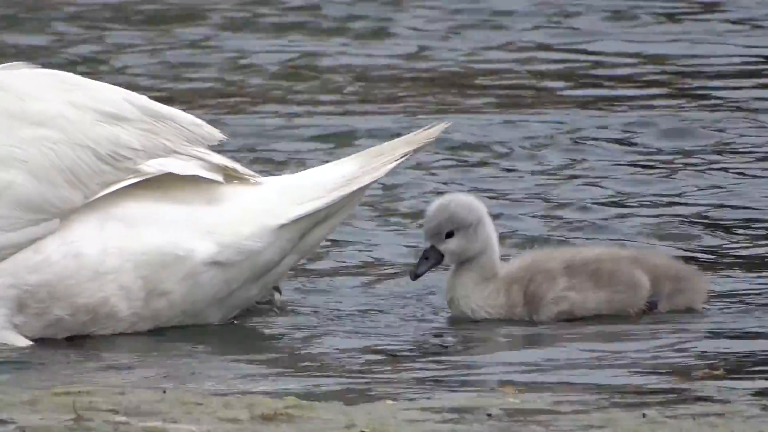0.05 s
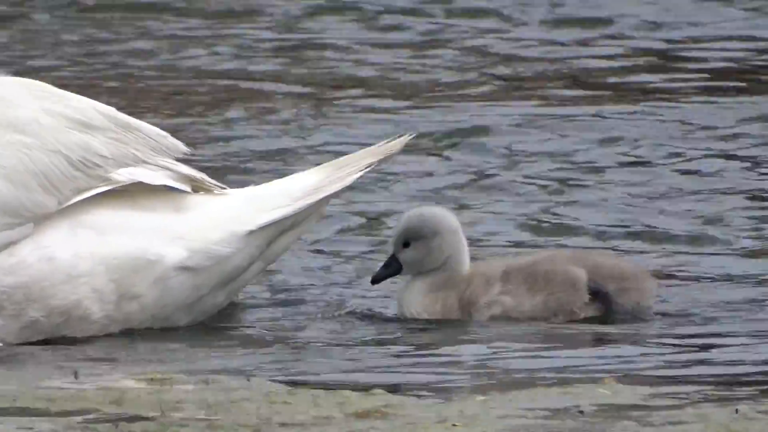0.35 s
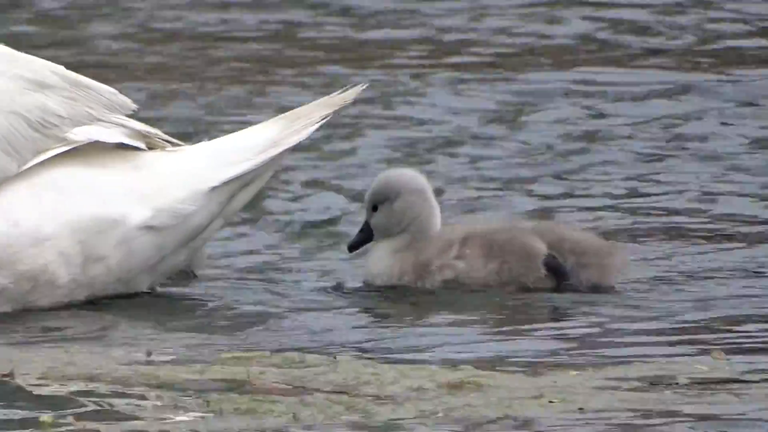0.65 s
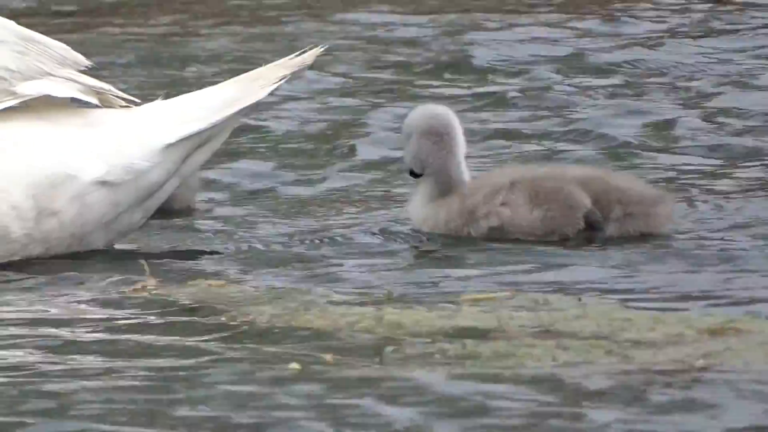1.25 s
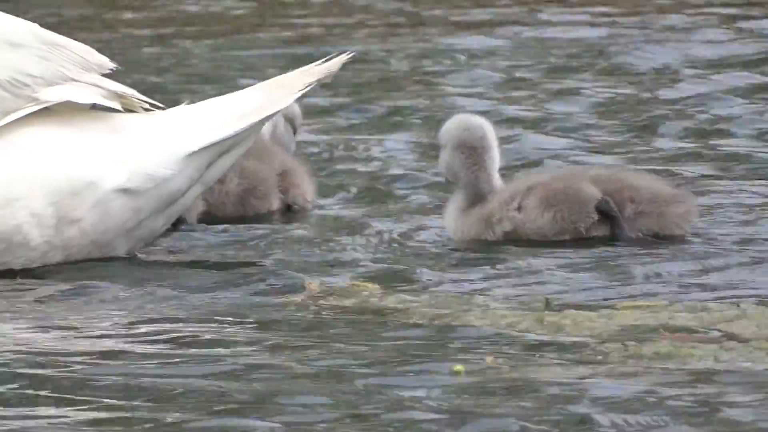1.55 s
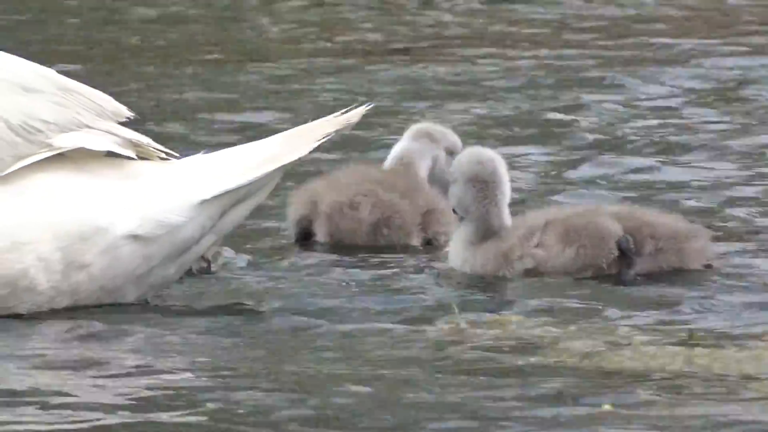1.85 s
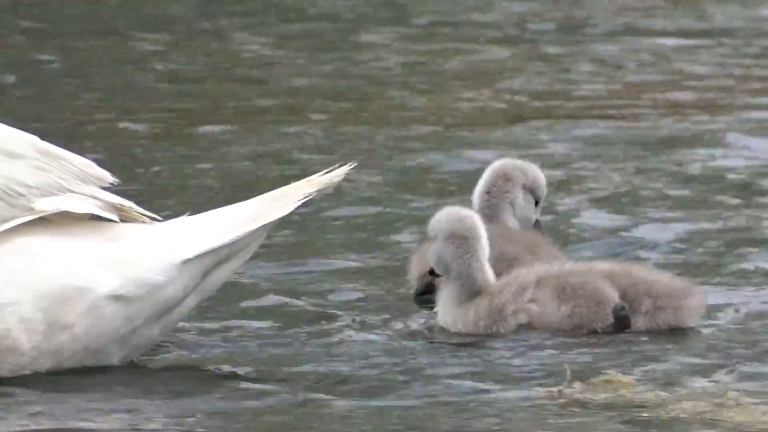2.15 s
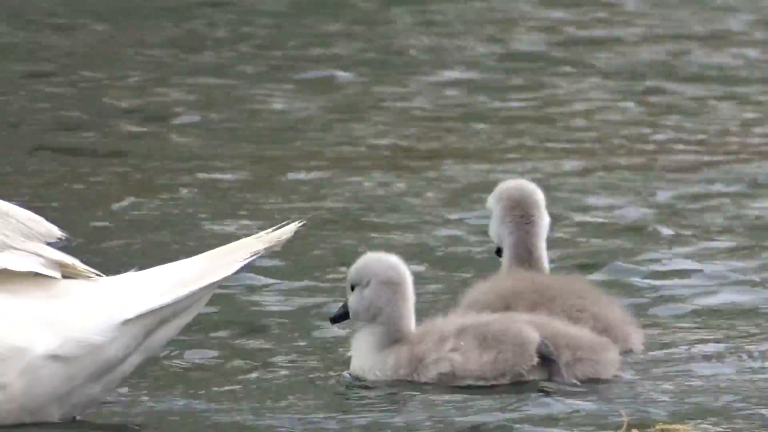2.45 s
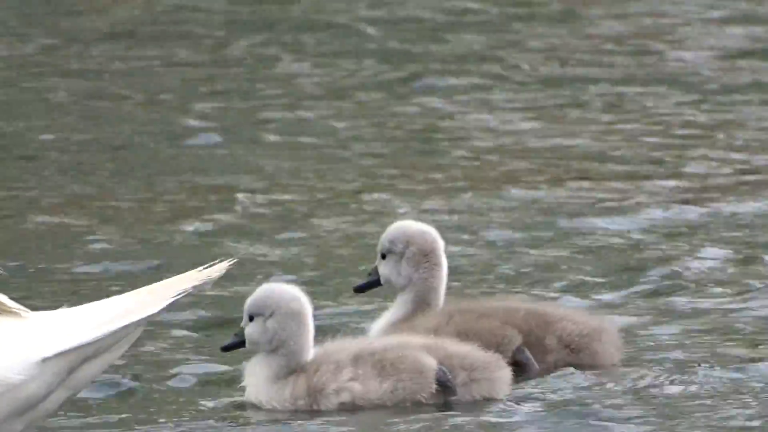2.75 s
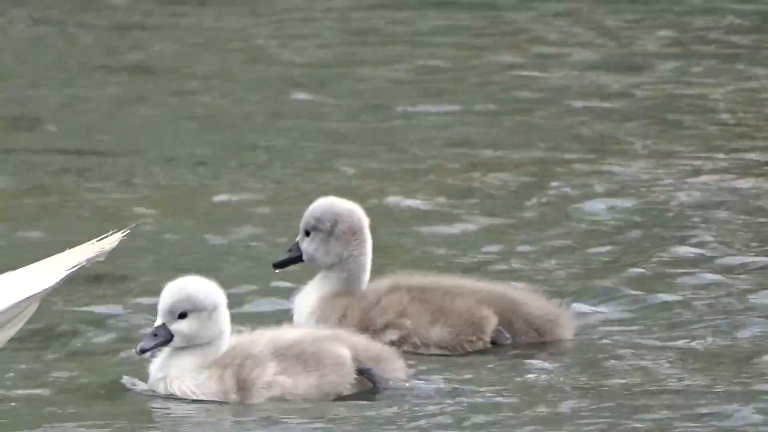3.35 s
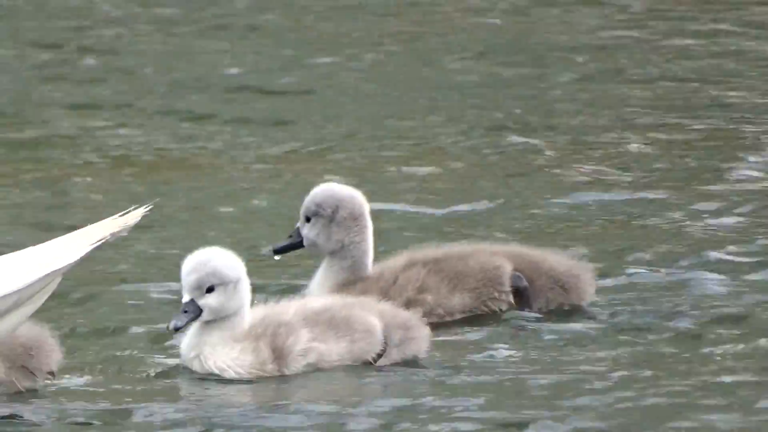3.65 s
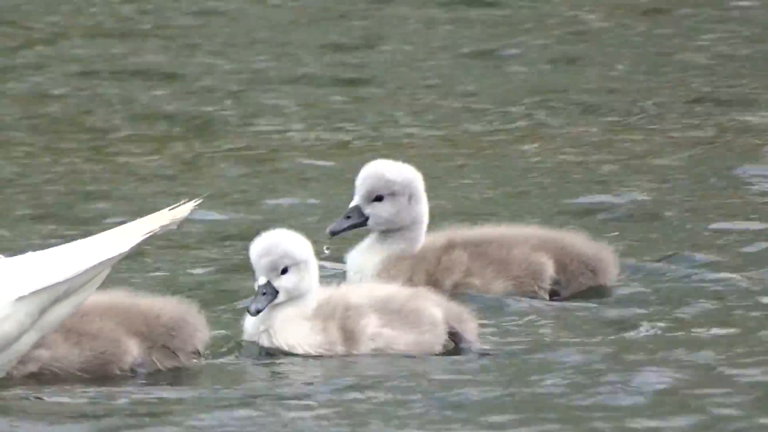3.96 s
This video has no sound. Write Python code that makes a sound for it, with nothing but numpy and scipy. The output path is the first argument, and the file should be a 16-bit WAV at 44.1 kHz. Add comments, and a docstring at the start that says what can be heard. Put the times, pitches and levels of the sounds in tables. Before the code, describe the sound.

A steady, bubbling rush of river water is heard outdoors from the bank. Little waves make brief plops and splashes nearby, pause, then come more quickly, while a soft rumble and faint wavering hum lie underneath.

```python
"""Water rushes steadily at a river's edge: thousands of small ringing bubbles over a smooth noise wash.
Under it lie a low distant rumble of shaped noise and a faint wavering hum.
Small waves plop close by, most often in the last second, each trapping one large bubble with a splash.
A camera's two closely spaced microphone ports colour the sound, with a deep notch near 7 kHz."""
import sys
import numpy as np
from scipy import signal
from scipy.fft import rfft, irfft
from scipy.io import wavfile
from scipy.ndimage import uniform_filter1d

SR = 44100
rng = np.random.default_rng(int(sys.argv[2]) if len(sys.argv) > 2 else 0)


def put_to_file(sound):
    """Save the sound as 16-bit audio at rate SR, in the file named by the first command-line argument."""
    columns = np.atleast_2d(sound).T  # one column per channel
    safe = np.clip(columns, -1, 1)
    whole_steps = np.round(safe * 32767)
    wavfile.write(sys.argv[1], SR, whole_steps.astype(np.int16))


N = 176400


def undb(db):
    """Decibels to gain."""
    return 10 ** (np.asarray(db) / 20)


def unit(x):
    """Scale to rms 1."""
    return x / np.sqrt(np.mean(x ** 2))


def freqs():
    """Bin frequencies in Hz, floored at 1."""
    return np.maximum(np.arange(N // 2 + 1) * SR / N, 1)


def noise_spectrum():
    """Spectrum of white noise."""
    return rfft(rng.standard_normal(N))


def over_hz(table, column=1):
    """Table column interpolated over log frequency."""
    rows = np.array(table)
    return np.interp(np.log(freqs()), np.log(rows[:, 0]), rows[:, column])


def over_time(table, column=1):
    """Table column interpolated over time."""
    rows = np.array(table)
    return np.interp(np.arange(N) / SR, rows[:, 0], rows[:, column])


def walk(per_s):
    """Random steps, smoothed twice, rms 1."""
    hold = int(SR / per_s)
    steps = np.repeat(rng.standard_normal(400), hold)[:N + hold]
    smooth = uniform_filter1d(uniform_filter1d(steps, hold), hold)
    return unit(smooth[hold // 2:hold // 2 + N])


def add(out, start_s, sound):
    """Mix a sound in at start_s."""
    i = int(np.clip(start_s * SR, 0, N - 1))
    out[i:i + len(sound)] += sound[:N - i]


# Each row: frequency in Hz, right port's phase lead in radians, coherence from 0 to 1.
PORT_RESPONSE = [(30, .01, .996), (100, .03, .996), (250, .11, .98), (500, .16, .91), (900, .22, .96),
                 (1250, .32, .88), (1600, .35, .97), (3000, 1.08, .95), (3750, 1.45, .76), (4150, .3, .7),
                 (4750, .89, .91), (5600, 1.7, .77), (7000, 3, .78), (7500, 2.8, .4), (7800, -.4, .45),
                 (8300, -.91, .64), (8800, -1, .82), (9500, -.88, .86), (10800, -.76, .79)]


def ports(direct, diffuse):
    """Left and right spectra at two close ports: offset in phase, with the diffuse part opposed."""
    half_lead = np.exp(.5j * over_hz(PORT_RESPONSE))
    coherence = over_hz(PORT_RESPONSE, column=2)
    mid = direct * np.sqrt((1 + coherence) / 2)
    side = diffuse * np.sqrt((1 - coherence) / 2)
    return np.array([(mid + side) / half_lead, (mid - side) * half_lead])


def bubble(hz, t60_s, rise):
    """A ringing air bubble; pitch climbs by the fraction rise as it decays."""
    t = np.arange(int(t60_s * SR) + 2) / SR
    phase = 2 * np.pi * hz * t * (1 + rise * t / t60_s / 2)
    return np.sin(phase) * np.exp(-np.log(1000) * t / t60_s)


BUBBLES_PER_S, RING_CYCLES, BUBBLES_DB = 3600, 10.1, -3.5


def froth():
    """Near-flat spectrum of many small bubbles of all sizes over a smooth wash."""
    wash = rng.standard_normal(N)
    bubbles = np.zeros(N)
    for when, pitch, strength in rng.random((int(BUBBLES_PER_S * N / SR), 3)):
        hz = 350 * (11000 / 350) ** pitch
        scatter_db = 2.5 * min(-np.log(1 - strength), 4.5)
        ring = bubble(hz, RING_CYCLES / hz, rise=.087)
        add(bubbles, when * N / SR, hz * undb(scatter_db) * ring)
    return rfft(wash + undb(BUBBLES_DB) * unit(bubbles) / np.sqrt(2))


# Each row: frequency in Hz, relative level at the left port in dB, at the right port in dB.
RUSH_COLOUR = [(20, -60, -62), (120, -19, -21.5), (244, -10.5, -11), (420, -7, -6.5), (500, -7.5, -7),
               (727, -3.5, -3), (970, -1, -0.45), (1180, -8.5, -6), (1595, -4.7, -1.5), (2040, -9, -4),
               (2590, -7.5, -4.0), (2956, -10.5, -6), (3464, -17.5, -15.5), (3930, -17, -19),
               (4270, -16, -11), (4770, -14, -8.5), (5450, -27, -16.5), (6150, -34, -28.5),
               (6660, -39, -49), (7500, -34, -32.5), (8260, -28.5, -28.5), (8600, -23.5, -25.0),
               (9980, -19.5, -19.5), (11240, -30, -28)]
# Each row: time in seconds, gurgle gain in dB.
GURGLE_GAIN = [(0, 1.3), (.3, 0.8), (.5, -0.8), (.7, -.2), (1.05, 0.5), (1.4, 0), (1.85, 0), (2.1, -1.5),
               (2.65, -1.7), (3, -1.3), (3.2, 1.3), (3.36, 2), (3.52, 2), (3.7, 2.5), (4, -0.7)]
# Each row: time in seconds, middle gain in dB, treble gain in dB.
MIDDLE_TREBLE_GAIN = [(0, 1.5, 1), (.13, 1, 1), (.3, -0.5, 1.3), (.43, -0.7, 1.2), (.55, -1.8, -2.5),
                      (.8, -2, -3.5), (.9, -2, -0.5), (1, 0.5, -0.3), (1.3, 1, -0.3), (1.65, 1, 0.2),
                      (2.1, 0.2, 0.2), (2.4, -1.5, 0), (2.6, -0.6, -1.3), (2.73, -1, -1.1),
                      (2.85, 2.5, 0.5), (3.05, -1.5, 0.7), (3.3, 0, 0.6), (3.65, -1.6, 0), (4, 0.5, -0.3)]
# Brief dip of the hiss just above the notch. Each row: time in seconds, gain in dB.
HISS_DIP = [(.44, 0), (.56, 0.5), (.9, -2.5), (1, 0.5)]
GURGLE_HZ, MIDDLE_HZ, TREBLE_HZ = 1000, 1910, 4500
DIP_HZ, DIP_OCTAVES = 7960, .26
RUSH_GAIN_DB, SURGE_DB, FLICKER_DB = -34.5, .27, .8


def rush():
    """Running water: three ranges swell slowly; half-octave bands surge together and flicker alone."""
    spectrum = ports(froth(), noise_spectrum() * np.sqrt(1 + undb(BUBBLES_DB) ** 2))
    spectrum *= undb([over_hz(RUSH_COLOUR), over_hz(RUSH_COLOUR, column=2)])
    spectrum /= np.std(irfft(spectrum, N))
    ranges_db = np.array([over_time(GURGLE_GAIN), over_time(MIDDLE_TREBLE_GAIN),
                          over_time(MIDDLE_TREBLE_GAIN, column=2)])
    log_ranges = np.log([GURGLE_HZ, MIDDLE_HZ, TREBLE_HZ])
    centres_hz = 350 * 2 ** (np.arange(11) / 2)
    surge_db = SURGE_DB * walk(per_s=16)
    out = np.zeros((2, N))
    for hz, one_band in zip(centres_hz, np.eye(len(centres_hz))):
        triangle = np.interp(np.log(freqs()), np.log(centres_hz), one_band)
        band = irfft(spectrum * triangle, N)
        shares = np.array([np.interp(np.log(hz), log_ranges, one_range) for one_range in np.eye(3)])
        dip_db = over_time(HISS_DIP) * np.exp(-.5 * (np.log2(hz / DIP_HZ) / DIP_OCTAVES) ** 2)
        flicker_db = FLICKER_DB * walk(per_s=22)
        out += band * undb(shares @ ranges_db + dip_db + surge_db + flicker_db)
    return out * undb(RUSH_GAIN_DB)


# Spectra of the rumble's three bands. Each row: frequency in Hz, relative density in dB.
BOTTOM_COLOUR = [(15, -18), (30, -12), (42, -7), (55, -3.5), (80, 2), (105, -0.5), (140, -9.5),
                 (300, -25), (1200, -48)]
BODY_COLOUR = [(15, -45), (60, -25), (100, -12), (125, -3), (153, 0.5), (182, -.5), (205, -6), (228, -3.5),
               (260, -9.5), (370, -19), (1200, -54)]
UPPER_COLOUR = [(20, -50), (100, -29), (200, -10.5), (260, -7), (300, 1), (370, -11.5), (600, -21),
                (1200, -42)]
# Each row: time in seconds, body level in dB, upper band level in dB.
RUMBLE_SWELLS = [(0, -47.5, -55), (.2, -47, -48.5), (.45, -46.5, -53), (.6, -43, -45), (1.05, -45, -46),
                 (1.35, -43, -50), (1.65, -45.5, -53), (2.03, -45.5, -45), (2.18, -39.5, -52),
                 (2.42, -41.5, -45), (2.6, -45, -50.5), (3.15, -41.5, -49.5), (3.32, -46, -54),
                 (3.48, -42.5, -59), (3.65, -47.5, -48), (3.92, -42.5, -46), (4, -45, -56)]
BOTTOM_DB = -51.5


def rumble():
    """Distant rumble: a steady bottom under two swelling noise bands, nearly mono."""
    def band(colour):
        spectrum = ports(noise_spectrum(), noise_spectrum()) * undb(over_hz(colour))
        return unit(irfft(spectrum, N))

    bottom = band(BOTTOM_COLOUR) * undb(BOTTOM_DB)
    body = band(BODY_COLOUR) * undb(over_time(RUMBLE_SWELLS))
    upper = band(UPPER_COLOUR) * undb(over_time(RUMBLE_SWELLS, column=2))
    return bottom + body + upper


HUM_HZ, HUM_DB = 116.9, -53


def hum():
    """A faint low tone wavering in pitch and level."""
    hz = HUM_HZ * (1 + .02 * walk(per_s=9))
    tone = np.sin(2 * np.pi * np.cumsum(hz) / SR)
    waver_db = 2.7 * walk(per_s=3.76)
    return undb(HUM_DB) * unit(tone * undb(waver_db))


# Each row: start in seconds, pitch in Hz, gain in dB, ring T60 in seconds, splash in dB re the ring.
WAVE_PLOPS = [(.036, 773, -27, .04, -9), (.542, 896, -26.5, 0.076, -11), (.825, 850, -28, 0.05, -13),
              (1.119, 1477, -26.5, .032, -9), (1.123, 720, -26, 0.037, -13),
              (1.496, 1820, -22.5, 0.023, -9), (1.509, 1450, -30, .04, -12), (1.843, 1720, -28, .03, -6),
              (3.291, 840, -22.5, 0.024, -10), (3.296, 1180, -27, .025, -6), (3.329, 850, -30, 0.033, -7),
              (3.362, 1130, -30, 0.032, -6), (3.4165, 1540, -25, 0.028, -10),
              (3.419, 1030, -26.5, .018, -4), (3.478, 975, -28.5, .05, -7), (3.508, 1010, -28, .045, -7),
              (3.645, 650, -22.5, .058, -11), (3.772, 678, -23.5, 0.071, -10),
              (3.785, 790, -27.5, 0.05, -7)]
PLOP_ATTACK_S = .00075
SPLASH_T60_S, SPLASH_PITCH_RATIO, SPLASH_OCTAVES = .052, 1.1, .33


def plops():
    """Each small wave traps one large bubble and splashes briefly, just above the bubble's pitch."""
    out, t = np.zeros(N), np.arange(N) / SR
    attack = 1 - np.exp(-t / PLOP_ATTACK_S)
    splash_decay = np.exp(-np.log(1000) * t / SPLASH_T60_S)
    for start_s, hz, gain_db, t60_s, splash_db in WAVE_PLOPS:
        octaves = np.log2(freqs() / (hz * SPLASH_PITCH_RATIO))
        colour = np.exp(-.5 * (octaves / SPLASH_OCTAVES) ** 2)
        splash = unit(irfft(noise_spectrum() * colour, N))
        plop = splash * undb(splash_db) * splash_decay
        add(plop, 0, bubble(hz, t60_s, rise=.06))
        add(out, start_s, undb(gain_db) * attack * plop)
    return irfft(ports(rfft(out), diffuse=0), N)


def scene():
    """Rushing water, distant rumble, hum and nearby plops."""
    return rush() + rumble() + hum() + plops()


def record(dry):
    """The camera cuts steeply above 11 kHz."""
    lowpass = signal.ellip(12, .1, 80, 11000, fs=SR, output="sos")
    return signal.sosfilt(lowpass, dry)


dry = scene()
out = record(dry)
put_to_file(out)
```